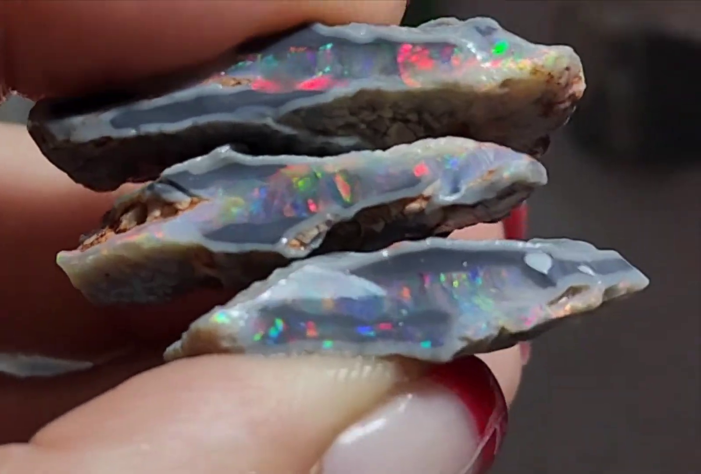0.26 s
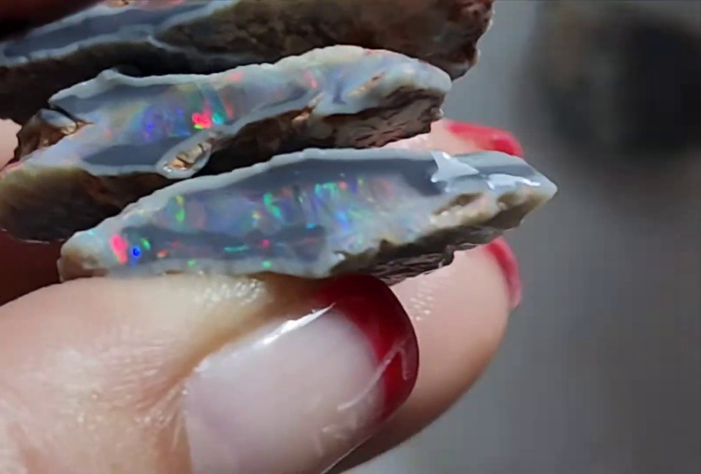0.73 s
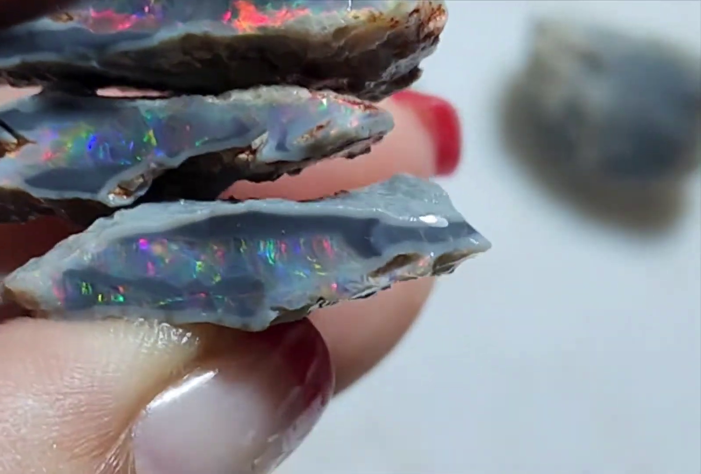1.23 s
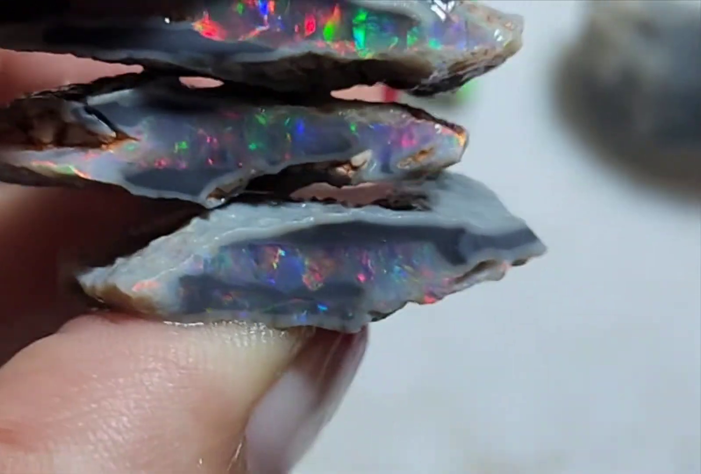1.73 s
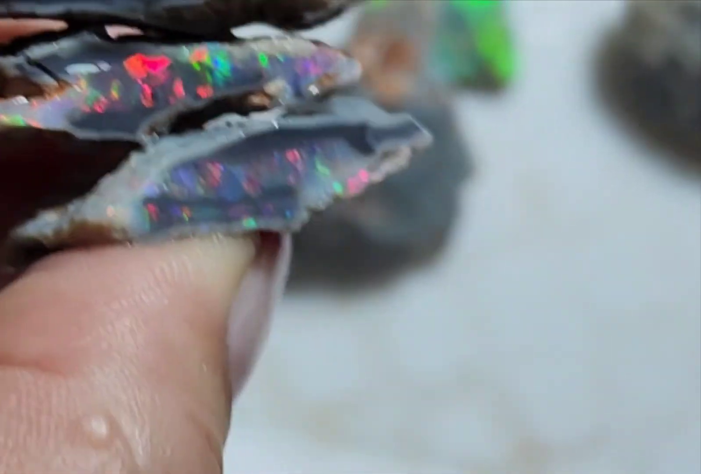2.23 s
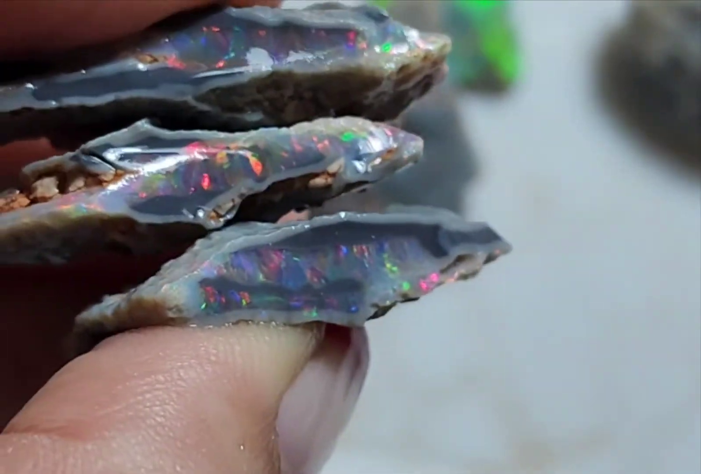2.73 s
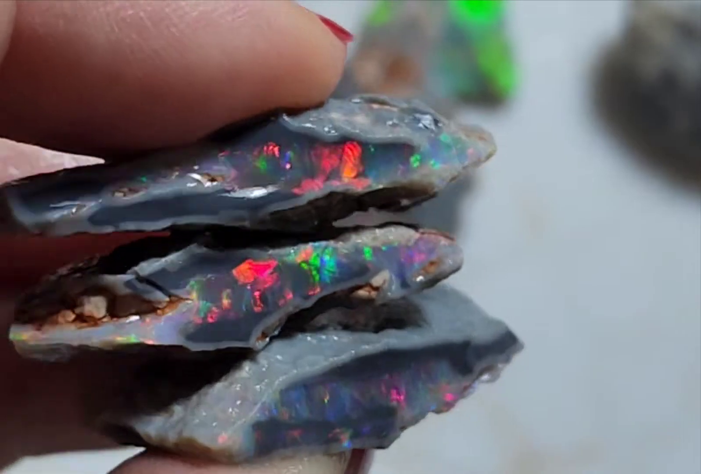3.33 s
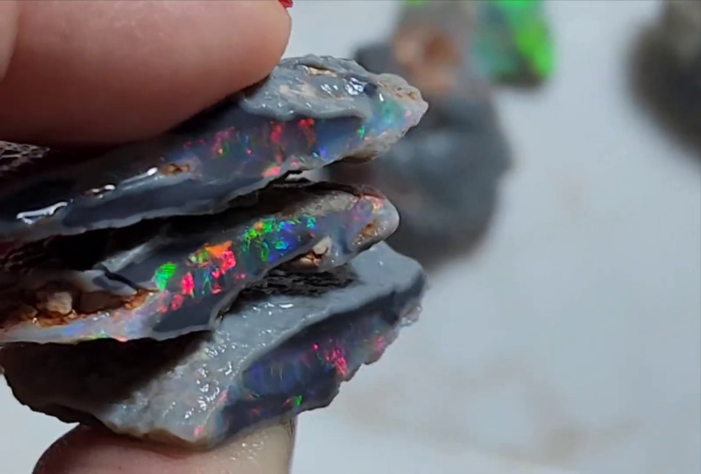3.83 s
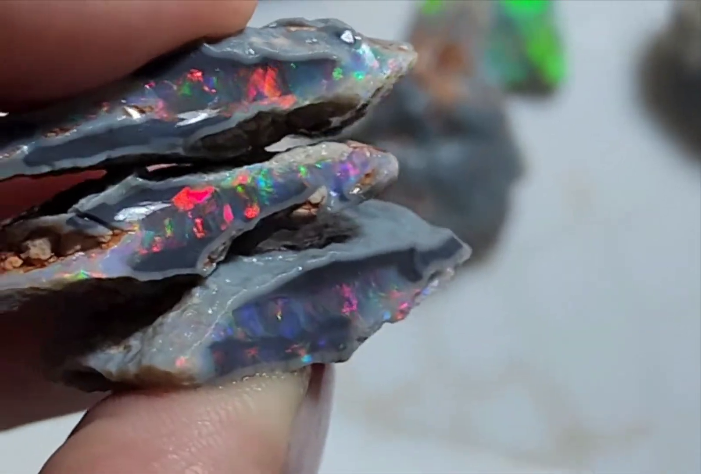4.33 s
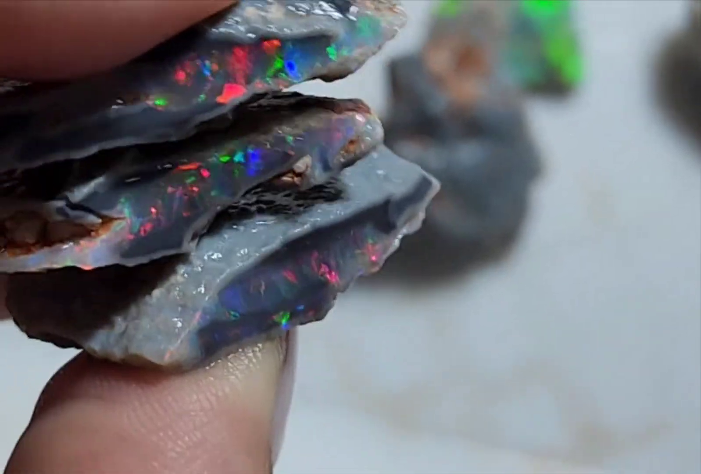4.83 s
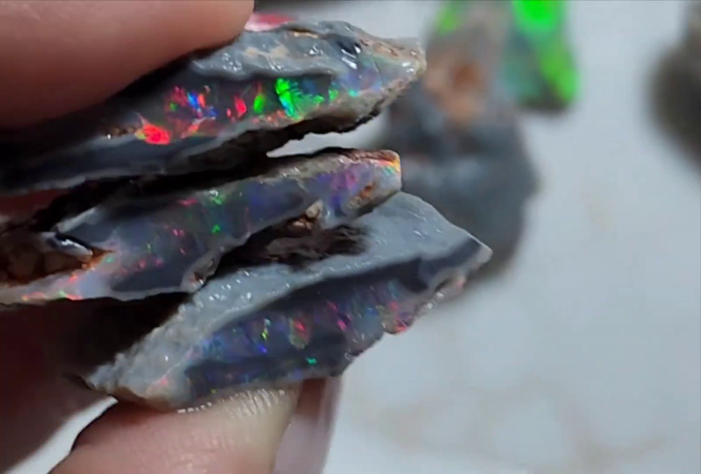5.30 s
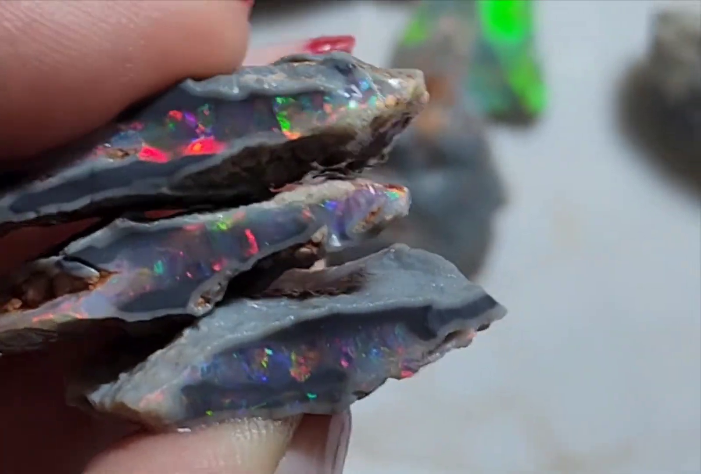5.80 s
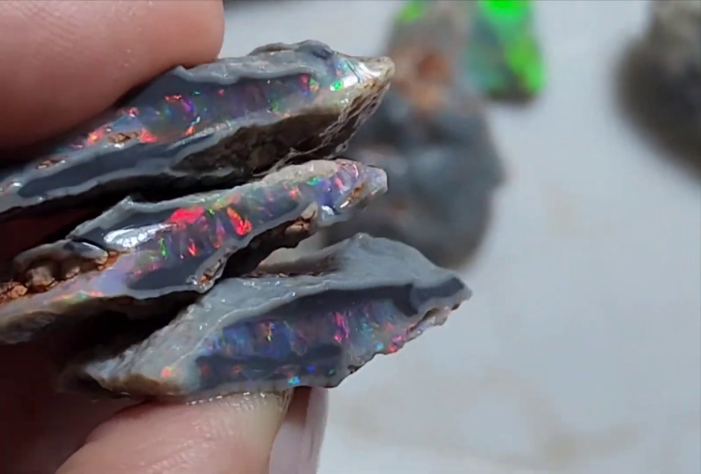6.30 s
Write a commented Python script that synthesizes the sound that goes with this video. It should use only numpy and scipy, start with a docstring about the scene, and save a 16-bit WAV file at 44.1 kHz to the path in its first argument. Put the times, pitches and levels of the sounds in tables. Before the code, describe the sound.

Small rough stones click, grind and scrape against each other between fingers, close up in a quiet room, gradually fading to faint rubbing.

```python
"""Three rough stones are shifted between the fingers right in front of a handheld phone in a quiet room.
A first knock and a tight burst come in the opening 0.6 s; rubbing and knocks crowd from 1 to 2 s,
thin out, crowd again from 2.6 to 3 s, then grow weaker until only faint rubbing and the room are left.
Grit catches and edge knocks are bursts of noise that ring the damped stones; the hand thuds into the phone.
A short echo surrounds the stones, and shaped noise makes the room's low hum and faint hiss."""
import sys
import numpy as np
from scipy import signal
from scipy.fft import rfft, irfft
from scipy.io import wavfile
from scipy.ndimage import uniform_filter1d

SR = 44100
rng = np.random.default_rng(int(sys.argv[2]) if len(sys.argv) > 2 else 0)


def output_pcm(signal):
    """Save a mono or channel-first signal as 16-bit PCM at the path in sys.argv[1].

    Samples are clipped to [-1, 1] before scaling.
    """
    pcm = np.clip(np.atleast_2d(signal).T, -1, 1) * 32767
    wavfile.write(sys.argv[1], SR, np.round(pcm).astype(np.int16))


N = 289075  # length in samples

# Rubbing strokes of the stones: [start/s, swell/s, hold/s, release/s,
# soft drag level/dB, stone grind level/dB, gritty scratch level/dB]
RUBBING_STROKES = [(0, .005, 0.14, .03, -70, -71, -68), (0.14, .015, 0.0081, 0.18, -33, -40, -46.5),
                   (0.263, .05, 0.0066, 0.13, -42, -39.5, -49.5),
                   (0.352, .03, 0.05, .05, -47, -48.5, -53.5),
                   (0.427, .03, 0.028, 0.032, -29.5, -59, -51.5), (.5, .03, 0.011, 0.062, -31, -20, -25.5),
                   (0.551, 0.077, 0.14, .03, -29, -28.5, -45), (0.749, .02, 0.031, .3, -42, -43, -57),
                   (0.879, .02, 0.1, 0.057, -56.5, -64, -58), (0.976, .04, 0.076, 0.21, -25, -28.5, -51),
                   (1.122, .1, 0.12, .05, -39, -28.5, -29), (1.284, .04, 0.21, 0.46, -27.5, -20, -18.5),
                   (1.754, .02, 0.092, 0.47, -41.5, -37, -69), (1.992, .03, 0.033, 0.05, -54, -41.5, -46),
                   (2.121, .03, 0.17, .6, -63, -61, -65), (2.565, .03, 0.28, 0.13, -33.5, -29.5, -31),
                   (2.716, .08, 0.05, 0.53, -23.5, -20.5, -18.5), (2.9, .05, .15, .06, -30, -25, -33.5),
                   (3.101, .02, 0.19, 0.2, -40.5, -36.5, -47.5),
                   (3.408, .05, 0.037, 0.19, -34, -34.5, -44.5),
                   (3.646, .05, 0.016, 0.18, -42.5, -42, -45.5), (3.876, .09, .06, .12, -37.5, -34, -35.5),
                   (4.028, 0.046, .05, .08, -37.5, -37, -35),
                   (4.114, .07, 0.015, 0.16, -35.5, -34.5, -39.5),
                   (4.327, .07, 0.25, 0.34, -50, -45.5, -49.5), (4.831, .14, 0.0053, 0.12, -54, -46, -57),
                   (4.999, .03, .1, 1.16, -68, -67, -67)]
PORT_WANDER_MS = 0.054  # how far the lag between the two microphone ports wanders as the stones move


def stones():
    """Rubbing and knocks ring the same modes: stone body, edges, finest grit and the hand holding them."""
    # Knocks: [time/s, body level/dB, edge level/dB, finest edge level/dB, chatter length/ms]
    knock_table = [(0.158, 0, -22, -46.5, 6.3), (0.164, -18, -23, -47.5, 6), (0.278, -34, -26.5, -32.5, 6),
                   (0.287, -44, -36, -48, 11), (0.325, -11, -37, -49, 9.9), (0.335, -24.5, -30, -44, 7.4),
                   (0.468, -31.5, -40, -53, 8.4), (0.521, -7, -17, -29, 7.3), (0.527, -12.5, 0.5, -27, 5.1),
                   (0.54, -4, -8.5, -27.5, 6.4), (0.548, -9.5, -28.5, -42, 9), (0.716, -15, -34, -55, 2.8),
                   (0.738, -12.5, -26.5, -55, 7.7), (0.748, -15, -45, -63, 8.3),
                   (0.763, -20.5, -35, -65, 6), (0.921, -48, -44, -50, 7.6), (1.117, -28, -37, -42, 6),
                   (1.137, -36, -32, -39, 11), (1.148, -24, -26, -37, 12), (1.161, -27, -22, -32.5, 16),
                   (1.256, -36, -17.5, -37, 9.6), (1.304, -12.5, -15.5, -45, 14),
                   (1.316, -19, -13, -24, 3.9), (1.402, -6, -13.5, -22.5, 6.5),
                   (1.524, -17.5, -12.5, -20, 8.1), (1.544, -11.5, -22.5, -14, 6.9),
                   (1.562, -12, -16.5, -19, 4.8), (1.626, -15.5, -14, -24, 6),
                   (1.637, -13, -12.5, -14, 5.5), (1.655, -30, -18.5, -22, 4.3),
                   (1.693, -24, -19, -28, 6.7), (1.717, -16, -18, -24.5, 8.7), (1.731, -19, -35, -21, 5.2),
                   (1.769, -14, -17, -25, 11), (1.778, -11.5, -27, -43, 7.3), (1.827, -21, -21, -27, 9.5),
                   (1.872, -21, -30.5, -27.5, 8), (1.88, -10.5, -23, -42.5, 6.7),
                   (1.891, -16.5, -28, -42.5, 4.2), (1.915, -30.5, -23.5, -30, 7.5),
                   (1.942, -24.5, -39, -49, 2.5), (1.967, -11, -22, -44, 9.2),
                   (1.976, -17.5, -26.5, -50, 8.9), (2.033, -26.5, -26, -33, 5.7),
                   (2.075, -14.5, -21.5, -46, 8.8), (2.272, -40, -38.5, -59, 17.5),
                   (2.389, -46, -47, -64, 6), (2.584, -18.5, -20, -41, 10.3), (2.608, -26, -16.5, -31, 8.9),
                   (2.639, -15.5, -16.5, -27, 6.7), (2.693, -12.5, -7.5, -17, 5.8),
                   (2.701, -14.5, -10, -26.5, 13), (2.726, -23.5, -20.5, -24.5, 18),
                   (2.816, -19, -10, -26.5, 4.9), (2.834, -9, -10.5, -25.5, 5.1),
                   (2.942, -19.5, -11.5, -20, 16), (2.97, -17.5, -21, -18, 6.8),
                   (2.985, -15, -15.5, -16, 7.8), (3.028, -14.5, -15, -38, 10), (3.187, -28, -31, -45, 6.7),
                   (3.215, -33, -27, -30, 7.3), (3.288, -18, -25, -29.5, 6),
                   (3.333, -19.5, -21.5, -32, 4.9), (3.372, -24.5, -34.5, -36, 12),
                   (3.418, -30.5, -27.5, -33.5, 6.8), (3.427, -28.5, -26, -32, 7),
                   (3.48, -1.5, -32.5, -52, 8.3), (3.504, -9.5, -35, -53.5, 7.9),
                   (3.564, -36, -25, -34, 5.8), (3.684, -25.5, -28.5, -53, 8.6),
                   (3.719, -13, -18.5, -35, 7.1), (3.878, -34.5, -36.5, -72, 18),
                   (3.918, -24, -52, -64, 7.2), (3.939, -26, -38, -55, 7.9), (3.991, -33, -22, -23.5, 15),
                   (4.007, -14, -16, -21, 6.2), (4.044, -26, -27, -41, 8.8), (4.13, -37, -30, -34, 10),
                   (4.169, -28, -26.5, -43, 7), (4.183, -23, -24.5, -36, 5.5),
                   (4.211, -13, -22.5, -45, 4.2), (4.219, -15.5, -27, -34, 7.3),
                   (4.237, -19, -25.5, -30, 12), (4.326, -33, -37, -64, 6.4), (4.391, -29.5, -66, -64, 6),
                   (4.453, -34, -29.5, -38, 8.6), (4.494, -30, -34.5, -56, 12), (4.531, -30, -38, -53, 10),
                   (4.55, -34, -35.5, -47, 18), (4.577, -27, -26, -31.5, 8.2), (4.643, -34, -37, -39, 7.3),
                   (4.654, -34, -32.5, -44, 7), (4.684, -31, -36, -45, 3.3), (4.706, -29, -44, -66, 7.4),
                   (4.752, -40.5, -58, -68, 6), (4.793, -34.5, -47, -75, 8), (4.844, -42, -55, -74, 6),
                   (4.973, -34.5, -34.5, -40, 11), (5.015, -45, -64, -76, 6), (5.149, -47.5, -66, -86, 6.3)]
    blows = np.vstack([knock_table, ticks()])
    t = np.arange(N) / SR
    coarse_t = t[::64]
    levels_db = [np.interp(t, coarse_t, curve) for curve in strokes(coarse_t)]
    drag_db, grind_db, scratch_db = levels_db
    # harder rubbing packs the catches closer (catches per second)
    rate = np.clip(200 * undb(.4 * (np.maximum(drag_db, grind_db) + 50)), 150, 900)
    # skin sliding on stone: a drag with hardly any scratch is smooth
    soft = np.clip((drag_db - scratch_db - 8) / 12, 0, 1)
    catches = (1 - soft) * grains(rate, spread_db=4, slip_ms=.9) + .7 * soft
    sound = stone_body(levels_db, soft, catches, blows)
    sound += stone_edges(scratch_db, catches, blows)
    sound += finest_grit(scratch_db, catches, blows)
    return sound + hand(grind_db, scratch_db, catches, blows)


def stone_body(levels_db, soft, catches, blows):
    """The bulk of the stones rings: drag wakes its low modes, grind the middle, both the upper ones."""
    # Body modes: [f/Hz, width/Hz, level/dB, left minus right/dB, left leads/rad]
    body_modes = [(519.3, 74, -9, -3, 1.76), (805.5, 252, -1, -0.5, 1.02), (1047, 526, -1.5, -7.5, 0.85),
                  (1364, 568, 3, -5.5, -1.22), (1875, 860, 0.5, -4.5, -2.5), (2340, 820, -12.5, -3.5, -3.5),
                  (2620, 1500, -4, 1.5, -1.53)]
    drag, grind, _ = undb(levels_db)
    # the constants added to the catches are a smooth slide beneath them
    body = drag * rubbing(body_modes[:2], catches + .6, alike=.9, patchy_db=3)
    body += grind * rubbing(body_modes[2:5], catches + .9, alike=.62, patchy_db=2)
    upper = undb(-9) * soft * drag + undb(-4) * grind
    body += upper * rubbing(body_modes[5:], catches + 1.7, alike=.96, patchy_db=-1)
    body += knocks(blows, body_modes, blows[:, 1], alike=.61, sharp=8.8, rise_ms=.47, spot_db=4)
    return band(body, 470, 3150)


def stone_edges(scratch_db, catches, blows):
    """Scratching grit and knocks ring the bright edges of the stones."""
    # Edge modes: [f/Hz, width/Hz, level/dB, left minus right/dB, left leads/rad]
    edge_modes = [(3530, 1100, -1, -8, 3.4), (4460, 1100, -8.5, 13.5, 1), (5780, 2500, 5.5, -3.5, 2.1),
                  (7250, 2300, -1, -9, 3.6), (8100, 3600, -5, -3, 0.5)]
    edge = undb(scratch_db) * rubbing(edge_modes, catches + 1.2, alike=.51, patchy_db=1.5)
    edge += knocks(blows, edge_modes, blows[:, 2], alike=.7, sharp=3, rise_ms=.6, spot_db=3.5)
    return band(edge, 3100, 9900)


def finest_grit(scratch_db, catches, blows):
    """The finest grit and edges ring at the very top, following the scratch."""
    # Finest modes: [f/Hz, width/Hz, level/dB, left minus right/dB, left leads/rad]
    fine_modes = [(11830, 2300, 3.5, -6.5, -3), (14000, 6000, -3.5, -2.5, 1.8), (14000, 850, -12, 3, -1.4)]
    fine = undb(finest_db(scratch_db))
    grit = fine * rubbing(fine_modes, catches + 1.9, alike=.55, patchy_db=2.5)
    grit += knocks(blows, fine_modes, blows[:, 3], alike=.75, sharp=2.5, rise_ms=.16, spot_db=11)
    return band(grit, 9700, 17000)


def hand(grind_db, scratch_db, catches, blows):
    """The hand thuds low into the phone with the rubbing and the knocks, and jolts it now and then."""
    # Low modes of hand and phone: [f/Hz, width/Hz, level/dB, left minus right/dB, left leads/rad]
    hand_modes = [(59.6, 40, -20, -.5, 0.1), (135, 35, -4, -.5, 0.073), (204, 140, 1, 0, 0.18),
                  (292, 110, -4.5, .5, 1)]
    # The hand jolts the phone: [time/s, level/dB, length/ms (held to 30 at most)]
    jolt_table = [(.005, -42.5, 25), (.166, -30.5, 33), (.29, -44, 30), (.465, -31, 33), (.745, -35, 28),
                  (1.15, -38, 30), (3.31, -29.5, 36), (3.5, -23.5, 26), (3.96, -36, 30), (4.14, -32.5, 23),
                  (4.2, -51, 27), (4.423, -30.5, 13), (4.52, -35.5, 20), (5.37, -49.5, 20), (6.02, -48, 19)]
    jolts = np.array(jolt_table)
    thud = undb(.61 * (grind_db + scratch_db) / 2 - 22.5)
    bumps = catches + 1.4 * grains(67, spread_db=1.2, slip_ms=2.3)
    low = thud * rubbing(hand_modes, bumps, alike=1, patchy_db=3)
    low += undb(-22) * knocks(blows, hand_modes, blows[:, 1], alike=.97, sharp=5, rise_ms=1,
                              spot_db=6, size=2048)
    low += knocks(jolts, hand_modes, jolts[:, 1], alike=1, sharp=.3, rise_ms=7, spot_db=3, size=4096)
    return band(low, 28, 450)


def strokes(t):
    """Drag, grind and scratch levels (dB): each stroke swells, holds and lets go; their powers add."""
    swing_db = 25  # a stroke climbs this far in its swell and falls this far in its release time
    start, swell, hold, release, *db = np.transpose(RUBBING_STROKES)[..., None]
    before = np.maximum((start + swell - t) / swell, 0)
    after = np.maximum((t - start - swell - hold) / release, 0)
    power = undb(2 * (np.array(db) - swing_db * (before + after)))
    return 10 * np.log10(np.sum(power, axis=1) + 1e-12)


def finest_db(scratch_db):
    """Level of the finest grit (dB): it rises faster than the scratch it goes with."""
    return 1.316 * scratch_db - 3


def ticks():
    """Lesser chance ticks, as rows like the knocks, a little over the rubbing they come from."""
    count, over_db, spread_db, length_ms = 32, .5, 1, 5
    when, size = rng.random((count, 2)).T
    s = when * RUBBING_STROKES[-1][0]  # anywhere up to the start of the last stroke
    _, grind, scratch = strokes(s) + over_db - spread_db * np.log(size)
    return np.transpose([s, grind, scratch, finest_db(scratch), length_ms + 0 * s])


def rubbing(modes, catches, alike, patchy_db):
    """Grain-driven noise into the modes; the contact spot wanders, so each mode swells on its own."""
    push = ports(alike) * catches
    pushes = (push * undb(patchy_db * walk(30)) for _ in modes)
    return unit(ring(modes, pushes, PORT_WANDER_MS * walk(6.5)))


def grains(rate, spread_db, slip_ms):
    """Random grit catches, a few loud among many faint, fading over about slip_ms; mean power 1."""
    hit = rng.random(N) < rate / SR
    size = np.minimum(rng.exponential(size=N), 3)
    impulses = hit * undb(spread_db * size) / np.sqrt(rate)  # closer catches are each weaker
    decay = np.exp(-1000 / (slip_ms * SR))
    return unit(signal.lfilter([1], [1, -decay], impulses))


def knocks(blows, modes, db, alike, sharp, rise_ms, spot_db, size=1152):
    """A blow builds at the pace of rise_ms, then chatters out; each contact spot weighs the modes anew."""
    start = (blows[:, 0] * SR).astype(int)
    length_ms = np.clip(blows[:, -1], .5, 30)[:, None, None]
    spot = rng.standard_normal((len(blows), len(modes) + 1))[..., None, None]
    t_ms = np.arange(size) * 1000 / SR
    noise, out = ports(alike), np.zeros((2, N))
    push = np.array([noise[:, i:i + size] for i in start])
    push *= (1 - np.exp(-t_ms / rise_ms)) * np.exp(-2 * t_ms / length_ms)
    push[..., int(rise_ms * SR / 1000)] -= sharp  # one sharp kick
    pushes = (push * undb(spot_db * spot[:, k]) for k in range(len(modes)))
    sounds = ring(modes, pushes, PORT_WANDER_MS * spot[:, -1])
    for i, sound, gain in zip(start, sounds, undb(db)):
        # the level is that of the loudest millisecond
        peak_power = uniform_filter1d(np.mean(sound ** 2, axis=0), 44).max()
        out[:, i:i + size] += gain * sound / np.sqrt(peak_power)
    return out


def ring(modes, pushes, lag_ms):
    """Each mode rings with its own push; the two ports hear it at their own level and phase."""
    out, side = 0, np.array([[.5], [-.5]])  # left, right
    for (hz, width, db, pan_db, lead), push in zip(modes, pushes):
        pole = np.exp((2j * np.pi * hz - np.pi * width) / SR)
        z = signal.lfilter([np.sqrt(width)], [1, -pole], push)
        # stone and hand ring in turn: dark valleys between the modes
        z = signal.lfilter([1 - abs(pole)], [1, -pole], z)
        turn = lead + 2 * np.pi * hz * lag_ms / 1000
        out = out + undb(db + pan_db * side) * np.imag(z * np.exp(1j * turn * side))
    return out


def ports(alike):
    """Noise for two microphone ports that share part of it (alike: 0 nothing, 1 everything)."""
    both, left, right = rng.standard_normal((3, N))
    return np.sqrt(alike) * both + np.sqrt(1 - alike) * np.array([left, right])


def walk(rate):
    """A random curve sliding to a new level every 1 / rate s; spread near 1."""
    k = int(SR / rate)
    steps = np.repeat(rng.standard_normal(N // k + 1), k)
    return 1.2 * uniform_filter1d(steps, k)[:N]


def undb(db):
    """Turn decibels into a plain factor."""
    return 10 ** (np.asarray(db) / 20)


def unit(x):
    """Scale to rms 1."""
    return x / np.sqrt(np.mean(x ** 2))


def band(x, lo_hz, hi_hz):
    """Steep skirts: a group of modes radiates little outside its range."""
    return signal.sosfilt(signal.butter(4, [lo_hz, hi_hz], "bandpass", fs=SR, output="sos"), x)


def echoes(x):
    """Table and walls return a short dull smear, unlike left and right."""
    echo_db, t60_s = -17, .09  # t60: time to fall by 60 dB
    t = np.arange(int(.2 * SR)) / SR
    tail = rng.standard_normal((2, len(t))) * undb(-60 * t / t60_s) * (t > .002)
    tail = signal.lfilter([.5], [1, -.4], tail)  # softens the treble
    tail /= np.sqrt(np.sum(tail ** 2, axis=1, keepdims=True))
    return undb(echo_db) * signal.fftconvolve(x, tail, axes=1)[:, :N]


def room():
    """Noise shaped into low hum and faint hiss; the bass is mostly alike at both ports and wavers."""
    # Colour of the room noise: [f/Hz, relative level per Hz/dB]
    room_colour = [(20, -16), (78, -0.5), (120, -10.5), (160, -5.5), (300, -16.5), (550, -23.5),
                   (1000, -32.5), (2200, -35), (3200, -41), (3680, -26.5), (4050, -43), (6200, -43.5),
                   (9000, -49.5), (16000, -59.5)]
    colour_hz, colour_db = np.array(room_colour).T
    hz = np.fft.rfftfreq(N, 1 / SR) + 1  # + 1 keeps the logarithm finite
    shape = undb(np.interp(np.log(hz), np.log(colour_hz), colour_db))
    alike = .9 / (1 + (hz / 450) ** 2)
    mid, side = rfft(rng.standard_normal((2, N)))
    side_gain = np.sqrt((1 - alike) / (1 + alike))
    pair = shape * (mid + side_gain * side * np.array([[1], [-1]]))
    low = hz < 400
    hum = irfft(pair * low, N) * undb(2 * walk(3.4))
    both = hum + irfft(pair * ~low, N)
    return both * undb(-55.5) / np.std(both.mean(axis=0))


def scene():
    """Stones, their echo and the room."""
    near = stones()
    return near + echoes(near) + room()


def record(dry):
    """The phone rounds the loudest peaks and cuts the top."""
    rounded = np.tanh(.84 * dry) / .87
    top_cut = signal.ellip(10, .2, 90, 15750, fs=SR, output="sos")  # edge at 15750 Hz
    return signal.sosfilt(top_cut, rounded)


dry = scene()
out = record(dry)
output_pcm(out)
```